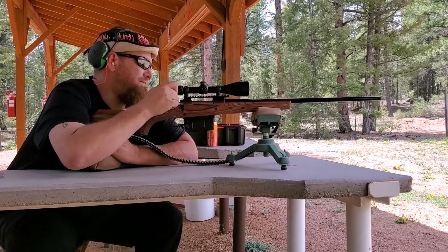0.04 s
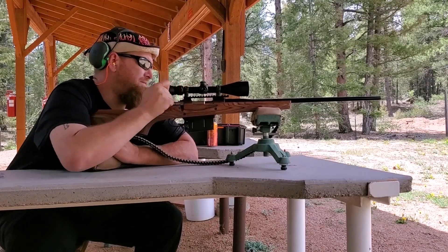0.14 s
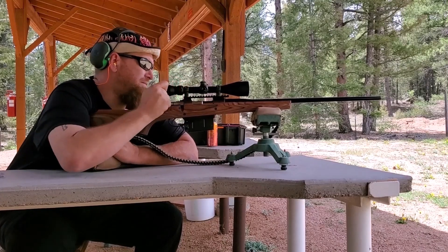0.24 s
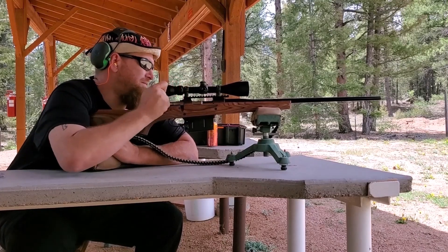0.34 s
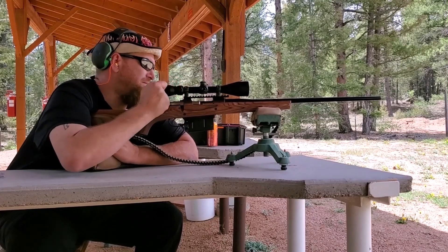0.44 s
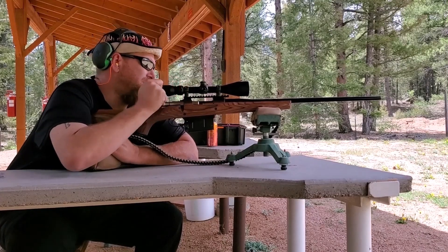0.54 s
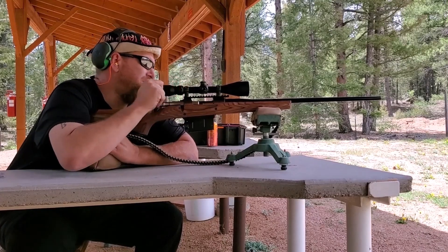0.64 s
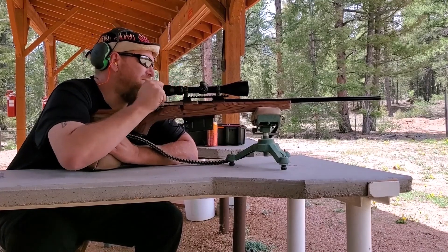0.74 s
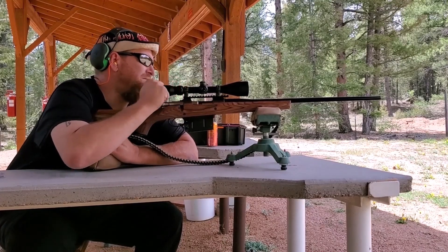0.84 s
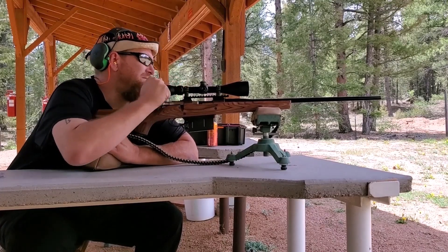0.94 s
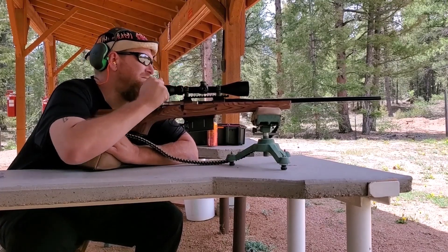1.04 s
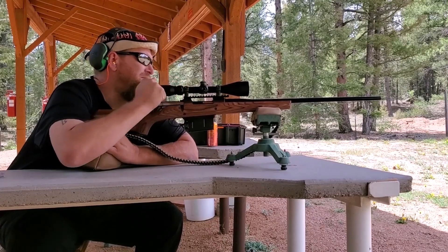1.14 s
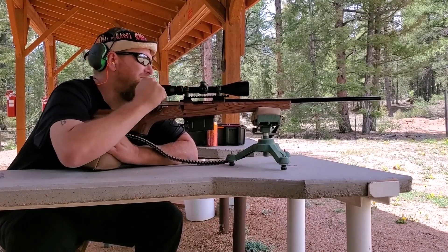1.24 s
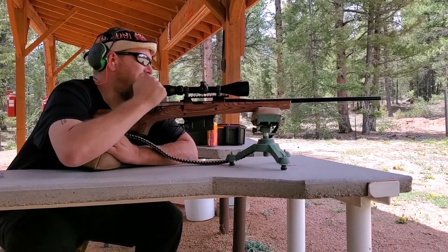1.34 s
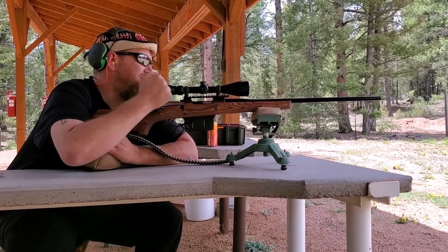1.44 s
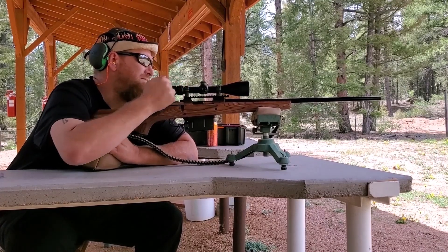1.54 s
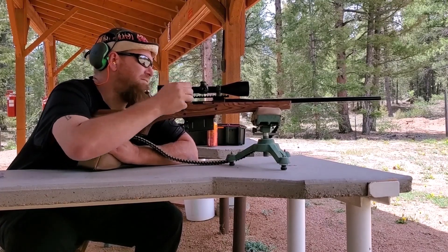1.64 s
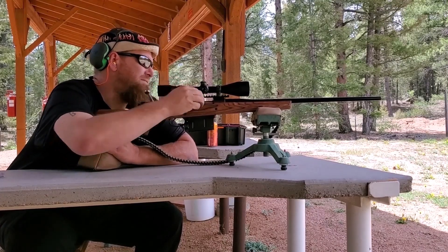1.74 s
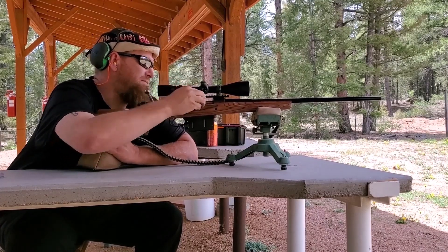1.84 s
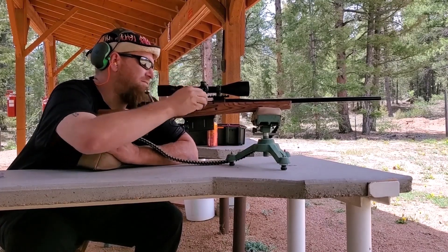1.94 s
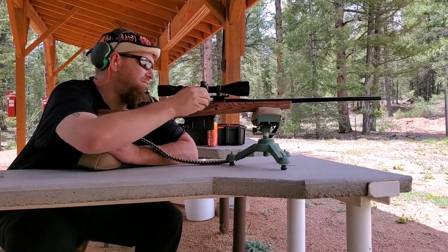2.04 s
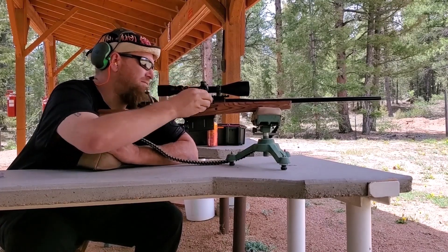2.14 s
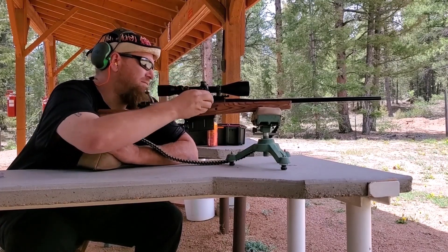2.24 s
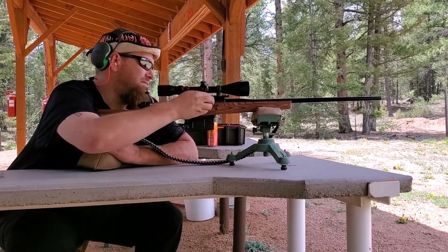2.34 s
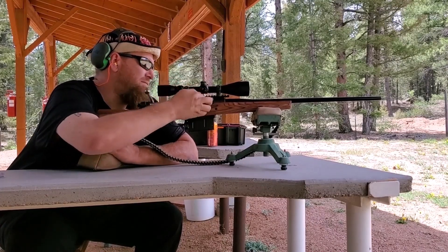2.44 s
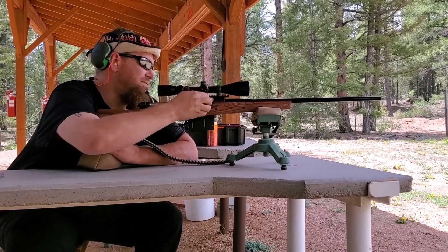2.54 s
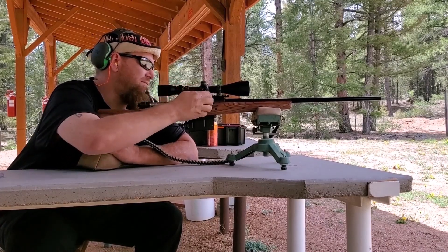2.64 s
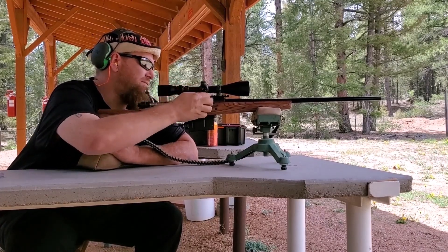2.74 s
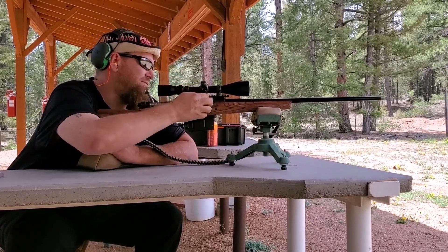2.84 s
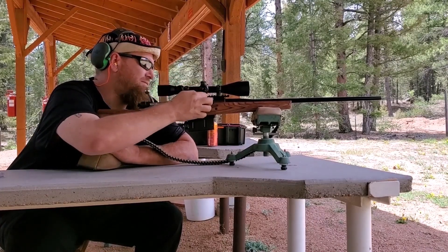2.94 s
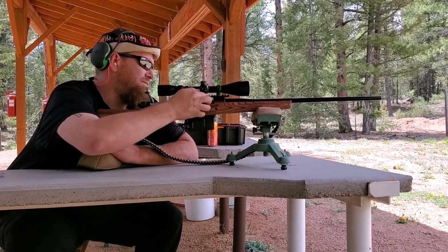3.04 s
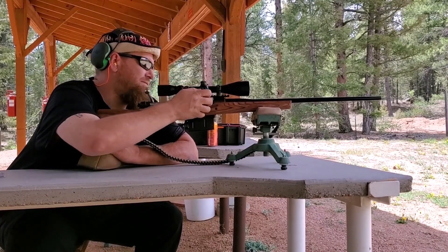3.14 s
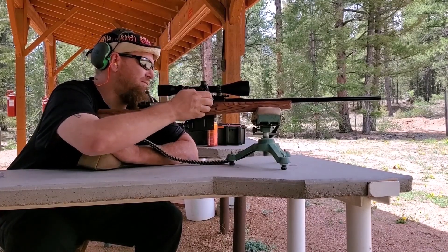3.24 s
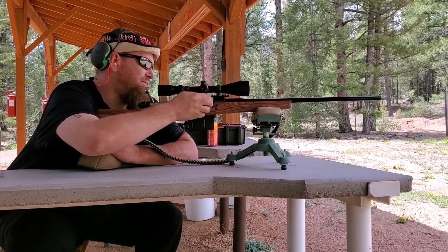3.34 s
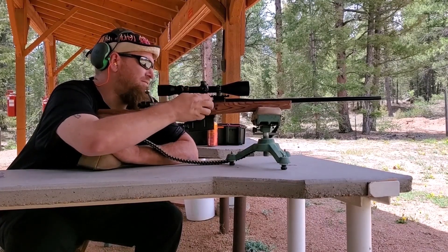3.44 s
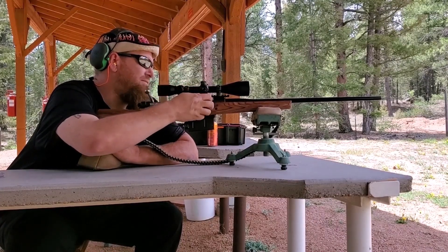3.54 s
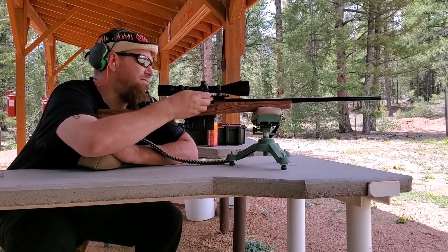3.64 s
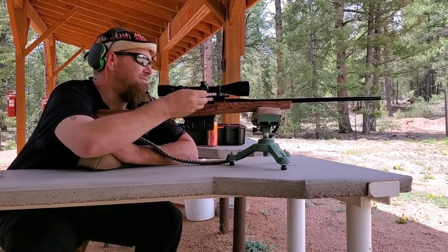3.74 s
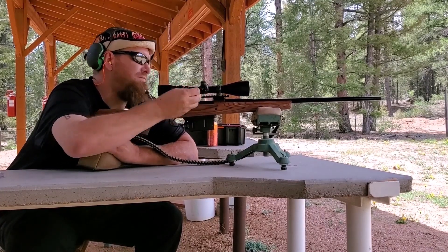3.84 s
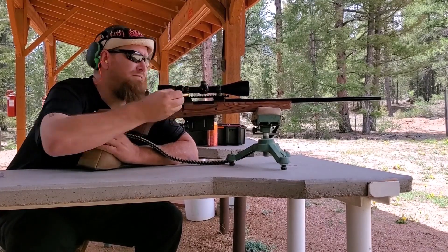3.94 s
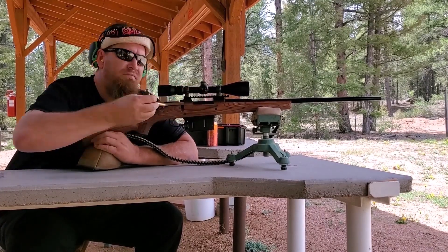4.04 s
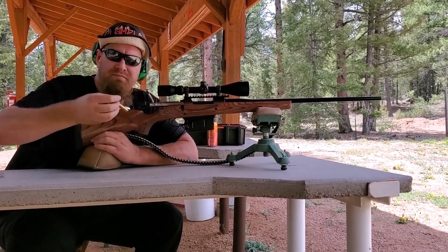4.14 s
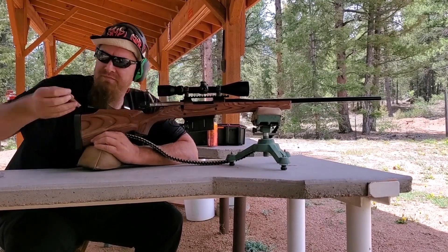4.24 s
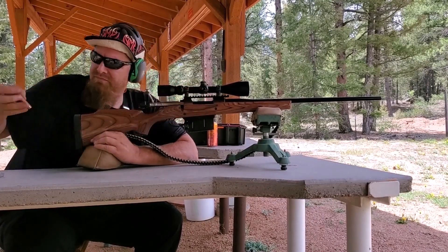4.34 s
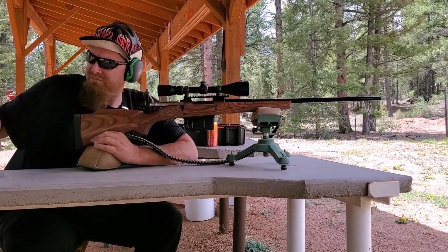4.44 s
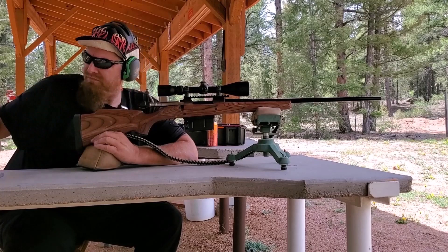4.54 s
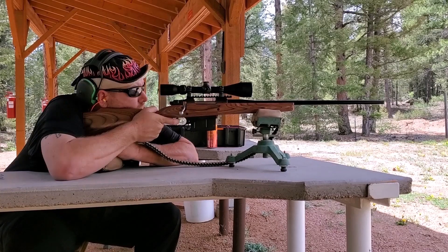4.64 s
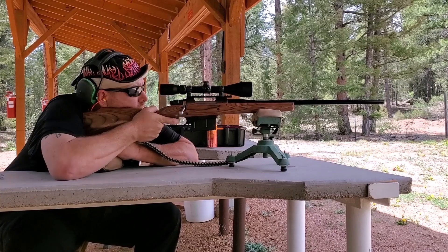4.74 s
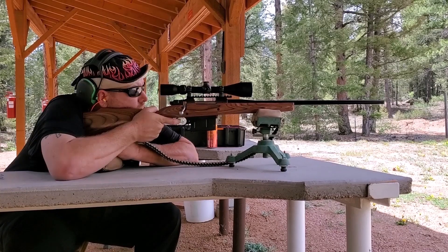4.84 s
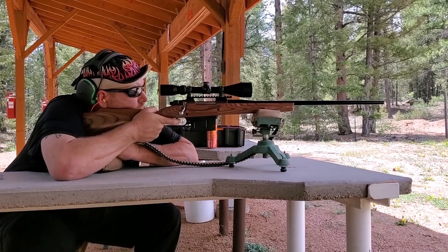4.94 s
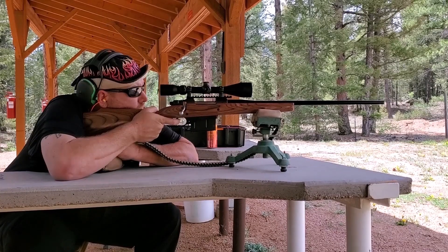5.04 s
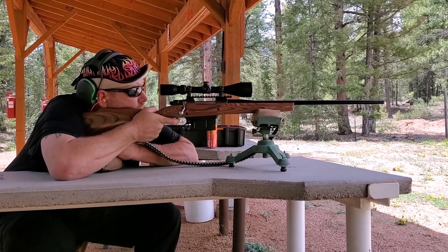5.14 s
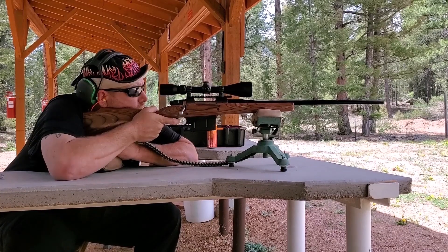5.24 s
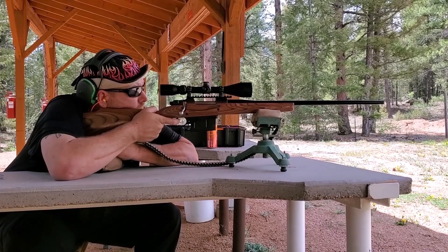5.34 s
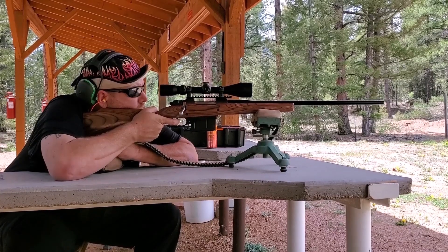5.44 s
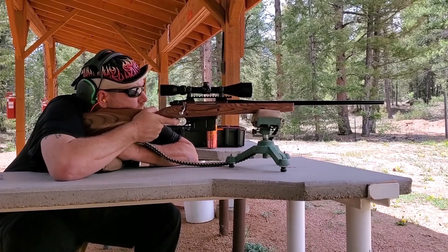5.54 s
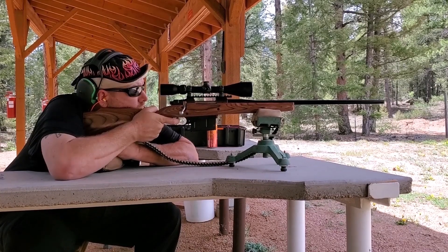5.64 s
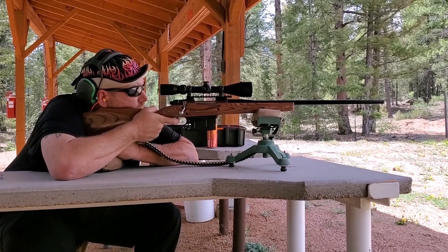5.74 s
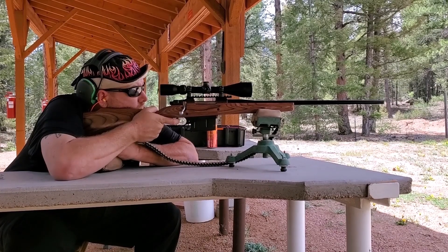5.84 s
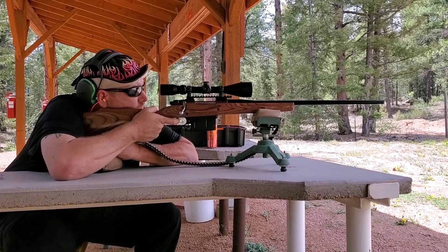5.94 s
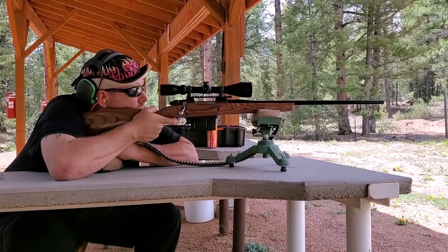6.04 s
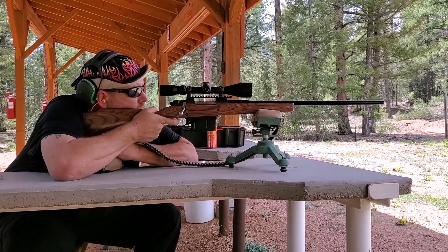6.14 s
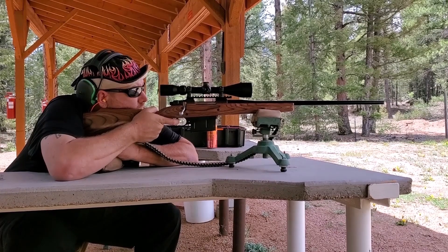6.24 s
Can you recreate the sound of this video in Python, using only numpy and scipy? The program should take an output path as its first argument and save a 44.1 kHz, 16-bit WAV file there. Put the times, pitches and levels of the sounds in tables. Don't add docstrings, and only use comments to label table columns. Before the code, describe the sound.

Hands work a rifle on a bench outdoors, very close: a light rattle, a pause, then a hard clattering bolt stroke with bright brass tinkles, later smaller clicks and scrapes and a final snap. Soft breeze and hiss lie behind. The sound dips momentarily, then a single sharp rifle blast fills the shelter; a far plate slaps and echoes dull away among trees, leaving the breeze subdued.

```python
import sys
import numpy as np
from scipy import signal
from scipy.fft import rfft, irfft, next_fast_len
from scipy.io import wavfile
from scipy.ndimage import uniform_filter1d, map_coordinates

SR = 44100
rng = np.random.default_rng(int(sys.argv[2]) if len(sys.argv) > 2 else 0)


def digitize_waveform(pressure):
    field = np.atleast_2d(pressure).T
    bounded = np.clip(field, -1, 1)
    quanta = np.round(bounded * 32767).astype(np.int16)
    wavfile.write(sys.argv[1], SR, quanta)


def invert_db(x):
    u = np.asarray(x, float) / 20
    return 10 ** u


N = 277157
SECONDS = np.arange(N) / SR
SHOT_S, SLAP_S = 4.85542, 5.14235


def unit(x):
    return x / np.sqrt(np.mean(x ** 2) + 1e-20)


def along(points, hz):
    f, v = np.transpose(points)
    return np.interp(np.log(hz + 1), np.log(f + 1), v)


def curve(points):
    s, v = np.transpose(points)
    return np.interp(SECONDS, s, v)


def wobble(rate):
    knots = rng.standard_normal(int(N * rate / SR) + 4)
    return map_coordinates(knots, [SECONDS * rate])


def filtered(x, response):
    m = next_fast_len(x.shape[-1] + 8192)
    return irfft(rfft(x, m) * response(np.fft.rfftfreq(m, 1 / SR)), m)[..., :x.shape[-1]]


def resonances(modes):
    def response(f):
        total = 0
        for k, (centre, width, db) in enumerate(modes):
            damping = 1j * f * width
            total = total + (-1) ** k * invert_db(db) * damping / (centre * centre - f * f + damping)
        return total
    return response


def no_lows(hz):
    return lambda f: f ** 2 / (f + hz / 1j) ** 2


def add(track, s, sound):
    start = round(s * SR)
    track[..., start:start + sound.shape[-1]] += sound


def rush(spectrum, patchy_db, tilt=lambda hz, s: 0, alike=None):
    # frequency in Hz, left-right likeness from -1 to 1.
    usual_likeness = [(60, 0.9), (290, 0.69), (640, 0.21), (1400, -0.34), (3000, -0.064)]
    likeness = usual_likeness if alike is None else alike
    hz, s, z = signal.stft(rng.standard_normal((2, N)), SR, nperseg=256)
    patches = uniform_filter1d(rng.standard_normal(z.shape[1:]), size=3, axis=0)
    patches = uniform_filter1d(patches, size=14, axis=1)
    gain = invert_db(patchy_db * unit(patches) + tilt(hz[:, None], s))
    pair = signal.istft(z * gain, SR, nperseg=256)[1][:, :N]
    power = np.mean(invert_db(along(spectrum, np.arange(SR // 2))) ** 2)

    def mid_side(f):
        angle = np.arccos(np.clip(along(likeness, f), -1, 1)) / 2
        return invert_db(along(spectrum, f)) / np.sqrt(power) * [np.cos(angle), np.sin(angle)]

    mid, side = filtered(pair, mid_side)
    return np.array([mid + side, mid - side])


def dying(parts, s):
    age = SECONDS - s
    power = sum(invert_db(db - 60 * np.abs(age) / t60) ** 2 for db, t60 in parts)
    return (age >= 0) * np.sqrt(power)


def slips(response):
    uneven_db = 4.3 * wobble(300) + 1.2 * wobble(70)
    return unit(filtered(rng.standard_normal(N) * invert_db(uneven_db), response))


def from_right(pulse, s, lag_s, left_db, low_hz):
    pair = np.zeros((2, N))
    add(pair[0], s + lag_s, invert_db(left_db) * pulse)
    add(pair[1], s, pulse)
    return filtered(pair, no_lows(low_hz))


def woods():
    # frequency in Hz, dB per Hz.
    pines = [(47, -32), (80, -12.5), (118, -10), (214, -8), (301, -10), (476, -7.5), (534, -9),
             (753, -11.5), (1170, -24), (1650, -26), (2150, -37), (4000, -44.5), (5200, -74), (8800, -120)]
    rumble = [(12, -53.5), (20, -20.5), (36, -12), (50, -0.5), (64, 3.5), (130, -14), (200, -17.5),
              (260, -43), (440, -120)]
    hiss = [(1470, -35.5), (2100, -11.5), (2450, -16.5), (2800, -7), (3320, -6), (3460, -8), (4310, -6.5),
            (5420, -7.5), (5910, -6.5), (6250, 0), (6550, -0.5), (7150, -12.5), (7920, -19.5),
            (10800, -9.5), (15100, -4), (16100, -10.5), (16500, -29.5)]
    # time in seconds, level in dB.
    breeze_level = [(0, -56), (0.9, -59.5), (1.3, -54.5), (1.67, -57.5), (2.3, -56.5), (3.37, -61.5),
                    (3.65, -60), (3.98, -61.5), (4.8, -63.5), (5.7, -69.5), (6.28, -70)]
    # time in seconds, gain in dB.
    duck = [
        (0, 5),
        (2.5, 3.5),
        (4, 3),
        (4.85, 2.5),
        (4.9, -6),
        (6.28, -2),
    ]
    # peak in seconds, peak in dB, dB lost per second on both sides, left over right in dB.
    gusts = [(0, -65.5, 23.5, -6), (1.18, -66, 84.5, -8), (1.36, -54.5, 76.5, 4), (1.7, -60.5, 80.5, -3.5),
             (2.45, -60.5, 57, 2), (3.4, -57, 99.5, -1.5), (3.85, -66.5, 69, -2), (4.19, -55, 60.5, -2.5),
             (4.57, -63, 89, -2), (4.82, -71, 149.5, -1.5), (5.1, -66.5, 60.5, 1), (5.68, -66.5, 153, 9),
             (5.81, -63.5, 202, 11), (6, -69, 201.5, 7), (6.12, -75, 200.5, 12), (6.24, -62, 110.5, 13)]
    # frequency in Hz, left over right in dB.
    lean = [(300, -2), (700, -1), (1600, 4.5), (5000, 3.5), (12000, 2)]
    calm_db, hiss_db = -78, -83
    duck_db = curve(duck)
    breeze = invert_db(curve(breeze_level) + 2.0 + wobble(5.4)) * rush(pines, patchy_db=1.53)
    push = invert_db(calm_db + duck_db)
    for s, db, fall_db, left_db in gusts:
        gust = invert_db(db - 3.5 - fall_db * np.abs(SECONDS - s))
        push = push + gust * invert_db([[left_db / 2], [-left_db / 2]])
    flutter_db = 1.6 * wobble(9.1) + 1.2 * np.array([wobble(6), wobble(5.1)])
    buffet = push * invert_db(flutter_db) * rush(rumble, patchy_db=-0.5)
    air = breeze + invert_db(hiss_db + 2.5 + duck_db) * rush(hiss, patchy_db=1.4)
    return buffet + filtered(air, lambda f: invert_db(along(lean, f) * [[.5], [-.5]]))


def shelter(x):
    # frequency in Hz, t60 in seconds.
    decay = [(500, 0.13), (3000, 0.11), (12000, 0.052)]
    delay_s = .002
    wet, hop = np.zeros((2, N + SR)), SR // 5
    for start in range(0, N, hop):
        hz, t, z = signal.stft(rng.standard_normal((2, SR // 4)), SR, nperseg=128)
        fall = invert_db(-60 * t / along(decay, hz)[:, None])
        tail = signal.istft(z * fall, SR, nperseg=128)[1]
        tail = tail / np.linalg.norm(tail[0])
        add(wet, start / SR + delay_s, signal.fftconvolve(x[None, start:start + hop], tail, axes=1))
    return wet[:, :N]


def strokes():
    # full force in seconds, rise in seconds, hold in seconds, scrape in dB, hum over scrape in dB.
    pushes = [(0.154, 0.062, 0.11, -44.5, 0), (0.43, .025, 0.025, -63, 2),
              (0.781, 0.043, 0.022, -74.5, 12.5), (1.024, 0.028, 0.027, -69.5, 15.5),
              (1.085, 0.15, 0.081, -73, -6), (1.202, 0.033, 0.055, -39, 1), (1.31, 0.05, 0.087, -41.5, -2),
              (1.782, 0.068, .005, -79, 17), (1.85, 0.077, 0.027, -82, 9), (1.941, 0.032, 0.099, -51, 0.5),
              (2.364, 0.08, .03, -73.5, 15), (2.399, 0.018, 0.023, -45.5, -1),
              (2.433, 0.011, 0.0027, -44, 2.5), (3.014, 0.028, 0.057, -43, -3),
              (3.133, .02, 0.037, -66.5, 7), (3.206, .02, 0.02, -65, -8), (3.249, 0.012, 0.074, -60.5, 3),
              (3.513, 0.38, .005, -79.5, 19.5), (3.641, 0.011, 0.0041, -36, -6.5),
              (3.695, 0.06, 0.032, -51, -7), (3.749, .02, 0.017, -60, 4), (3.26, .02, 0.0078, -69, -3),
              (2.448, .02, .02, -56, 5.5), (2.582, .04, .02, -72, 9), (3.79, 0.011, 0.0021, -41.5, 3.5)]
    rise_db, let_go_db_per_s = 29.5, 331
    receiver_db, receiver_grows = -50.5, 0.74
    gains, t = np.zeros((3, N + SR)), np.arange(-SR // 8, SR // 2) / SR
    for s, rise_s, hold_s, db, hum_db in pushes:
        before, after = np.clip(-t, 0, None), np.clip(t - hold_s, 0, None)
        force = invert_db(-rise_db * before / rise_s - let_go_db_per_s * after)
        tube_db = receiver_db + receiver_grows * (db + 45.0)
        add(gains, s + t[0], force * invert_db([[db], [tube_db], [db + hum_db]]))
    return gains[:, :N]


def stock(hum):
    # time in seconds, peak in dB, pitch in Hz.
    knock_times = [(0.142, -39, 760), (0.171, -39, 712), (0.201, -22.5, 793), (0.241, -38.5, 722),
                   (0.903, -51.5, 650), (1.027, -44.5, 720), (1.194, -38, 720), (1.205, -23.5, 796),
                   (1.214, -25.5, 777), (1.255, -27, 695), (1.276, -46, 794), (1.293, -21.5, 755),
                   (1.299, -30, 738), (2.417, -44, 760), (3.098, -45, 760), (3.267, -52, 760),
                   (3.281, -55, 780), (1.342, -27, 750), (1.382, -28.5, 786), (1.434, -40.5, 796),
                   (1.952, -42.5, 764), (1.984, -39.5, 774), (1.999, -41, 890), (2.407, -37.5, 754),
                   (2.436, -28, 775), (2.457, -30.5, 752), (2.53, -43, 773), (2.682, -47.5, 680),
                   (2.781, -47, 791), (3.072, -29.5, 770), (3.129, -41, 756), (3.642, -29, 749),
                   (3.744, -45, 746), (3.752, -41.5, 757), (3.76, -44, 744), (3.025, -48, 750),
                   (3.037, -54, 760), (1.2635, -41, 726), (0.153, -43.5, 780), (3.795, -32, 758),
                   (3.803, -41, 750)]
    # time in seconds, peak in dB, pitch in Hz.
    raps = [(0.14, -46, 1620), (0.151, -45.5, 1650), (0.425, -55, 1600), (0.439, -53, 1630),
            (0.463, -57, 1590), (1.03, -56, 1570), (1.061, -53.5, 1604), (1.776, -61, 1570),
            (2.785, -58, 1374), (2.8, -59, 1403), (3.005, -52.5, 1570), (3.029, -43.5, 1560),
            (3.221, -55, 1520), (3.25, -65, 1340), (3.519, -61, 1586), (3.627, -53, 1620),
            (3.799, -43, 1374)]
    # time in seconds, level in dB, pitch in Hz.
    thumps = [
        (0.301, -46.5, 179),
        (1.381, -37.5, 167.6),
    ]
    # frequency in Hz, width in Hz, level in dB.
    hollow = [(625, 12, 0.5), (756, 24, 1), (816, 250, -5)]
    knocks, t = np.zeros(N), np.arange(SR // 8) / SR
    for s, db, hz in [*knock_times, *raps]:
        t60 = np.interp(db, [-37.5, -22.5], [0.036, 0.02])
        swell = invert_db(db + 7.5 - 60 * t / t60) * (1 - np.exp(-t / 0.0023))
        wander_hz = np.interp(db, [-48, -40], [450, 0])
        wander = wander_hz / SR * np.cumsum(uniform_filter1d(rng.standard_normal(len(t)), size=40))
        add(knocks, s, swell * np.sin(2 * np.pi * (hz * t + wander + rng.uniform())))
    for s, db, hz in thumps:
        thud = invert_db(db - 60 * t / .15) * (1 - np.exp(-t / .008))
        add(knocks, s, thud * np.sin(2 * np.pi * hz * t))
    steep = lambda f: resonances(hollow)(f) * resonances([(770, 450, 0)])(f)
    return knocks + invert_db(-3.0) * hum * slips(steep)


def brass():
    # time in seconds, peak of the main ring in dB, side rings in dB, top ring in dB over the main.
    cases = [(0.1979, -48, -3, -11), (0.2123, -46, -2, -10), (0.2384, -35, -6.5, -4), (0.2572, -48, -1, 2),
             (0.2794, -50, 0.5, -3), (1.217, -37.5, -5, -3.5), (1.3056, -34, -18.5, -8.5),
             (1.345, -38.5, -10, 0), (1.3808, -38.5, -8, -20.5), (1.926, -53, -40, -3),
             (1.943, -39, -30.5, -9), (1.9839, -44.5, -20, 2), (2.031, -58.5, 6, 9),
             (2.4014, -61, 7.5, 4.5), (2.4324, -34.5, -9, -19.5), (3.024, -51, 0, 0),
             (3.0557, -39.5, -13, -17), (3.084, -66, 4, -14), (3.245, -62.5, 6, -10), (3.27, -61.5, -1, -8),
             (3.7823, -46, -10, -18), (1.327, -39, -9, 2), (1.4314, -60, -14, -10), (2.006, -54, -1, 3),
             (2.412, -66, 3, 11)]
    ring_hz = [9476, 8700, 11530, 15240]
    lower_db, t60_s, split_hz = -4.5, 0.14, 24
    port_lag = 1.7 * np.array([[[0], [1]], [[1], [0]]])
    rings, t = np.zeros((2, N)), np.arange(SR // 4) / SR
    grip = np.exp(-(t / 0.078) ** 4)
    for s, db, side_db, top_db in cases:
        for hz, rel_db in zip(ring_hz, [0, side_db + lower_db, side_db, top_db]):
            pair_hz = hz + rng.normal(0, split_hz, (2, 1, 1))
            phase = rng.uniform(0, 2 * np.pi, (2, 1, 1)) + port_lag
            beat = np.sin(2 * np.pi * pair_hz * t + phase) * [[[1.2]], [[.45]]]
            fall = invert_db(db + rel_db + 1.5 - 60 * t / t60_s) * (1 - np.exp(-t / 0.00069))
            add(rings, s, fall * grip * beat.sum(axis=0))
    chatter = uniform_filter1d(np.abs(rings), size=200) * rng.standard_normal((2, N))
    rings = rings + invert_db(-11.0) * filtered(chatter, resonances([(12500, 5000, 0.0019)]))
    return rings * invert_db([[-1.5], [1.5]]) * invert_db(2.6 * np.array([wobble(120), wobble(120)]))


def steel(scrape, receiver):
    # time in seconds, peak in dB, brightness in dB, ping in Hz, ping over rattle in dB.
    snaps = [(0.148, -47, -17, 3050, 2), (0.165, -39, -14, 3330, -1), (0.172, -33, -9.5, 3700, -1),
             (0.1802, -56, -8, 3490, -8), (0.197, -29.5, -15, 3060, -7), (0.237, -24, -18, 2970, -7),
             (1.193, -33, -22, 3040, -5), (1.2146, -15, -21.5, 3100, -28), (1.2341, -14.5, -20, 4380, -16),
             (1.2518, -22, -16.5, 2650, -13), (1.307, -23.5, -16, 3060, -8),
             (1.3172, -13.5, -23, 3600, -14.5), (1.346, -22, -21, 3080, -11), (1.38, -18, -19, 3840, -8.5),
             (1.389, -28, -13, 4300, -5), (1.4316, -30, -19, 3990, -5), (1.9456, -31.5, -35, 3120, -7.5),
             (1.9834, -33.5, -21, 4150, -6), (1.999, -31.5, -22, 3950, -6), (2.3992, -34, -21, 3980, 8),
             (2.4333, -13, -22.5, 3200, -20), (2.991, -50, -31, 3100, -3), (3, -41, -29.5, 3200, -6),
             (3.009, -42, -28, 3100, -10), (3.0244, -33.5, -22, 3150, -8), (3.0568, -22, -24, 3340, -7.5),
             (3.071, -29, -18, 4960, -6), (3.1304, -33.5, -19.5, 2810, -6.5),
             (3.2437, -40.5, -27, 3270, -8), (3.2747, -37, -32, 3800, -1.5),
             (3.6265, -38.5, -23, 3950, -5.5), (3.6409, -19.5, -21, 2880, -8.5),
             (3.754, -41.5, -33, 2900, 5.5), (3.781, -26, -31, 3460, -9), (3.7925, -16, -21, 3950, -9),
             (3.7992, -31, -18.5, 4290, -12)]
    # time in seconds, peak in dB, ping in
    # Hz.
    ticks = [(0.1274, -61, 3170), (0.4228, -54, 3300), (0.4438, -51, 2940), (1.024, -64, 3010),
             (1.147, -63, 3570), (1.785, -67, 3150), (1.805, -60, 3130), (1.8497, -67, 3300),
             (2.232, -63.5, 4100), (2.3253, -64, 3850), (2.345, -67, 3950), (2.3622, -60, 4070),
             (2.3778, -52, 3880), (2.388, -61, 3970), (2.7874, -72, 3500), (3.2674, -43, 3460),
             (3.291, -52, 3300), (3.311, -56, 3900), (3.51, -65, 4250), (3.7886, -39.5, 4130),
             (0.5857, -56, 7600), (0.785, -61, 3100), (1.0588, -47, 3250), (1.1414, -54, 3400),
             (1.77, -67, 3210), (1.926, -53, 3120), (2.6415, -56, 3150), (3.2067, -52, 3970)]
    # frequency in Hz, width in Hz, level in dB.
    parts = [(2110, 850, -12), (3040, 530, -0.5), (3600, 740, 1), (4300, 730, -0.5), (5560, 500, -3.5),
             (5920, 600, -3), (7410, 740, -8)]
    tube_modes = [(1090, 130, -6), (1340, 87, 4), (1620, 370, -2)]
    slide = [(3080, 500, 2.5), (3700, 700, 0), (4400, 920, -2), (5900, 1100, -7.5), (7400, 1300, -11)]
    tick_bright_db, tick_ping_db, lag_s = -23.5, -4, 0.00042
    body, edge, pings = np.zeros((3, N))
    t = np.arange(SR // 8) / SR
    rise = 1 - np.exp(-t / 0.00025)
    snap_fall = invert_db(-60 * t / 0.012)
    rattle_fall = 1.12 * snap_fall + 0.26 * invert_db(-60 * t / 0.035)
    faint_snaps = [(s, db, tick_bright_db, hz, tick_ping_db) for s, db, hz in ticks]
    for s, db, bright_db, ping_hz, ping_db in [*snaps, *faint_snaps]:
        rattle = rise * rng.standard_normal((2, len(t))) * rattle_fall
        add(body, s, invert_db(db + 2.5) * rattle[0])
        add(edge, s, invert_db(db + bright_db + 10.0) * rattle[1])
        add(pings, s, rise * invert_db(db + ping_db + 2.5) * snap_fall * np.sin(2 * np.pi * ping_hz * t))
    thin = lambda f: resonances([(11000, 5000, 0)])(f) * no_lows(6000)(f)
    clicks = filtered(body, resonances(parts)) + filtered(edge, thin)
    sliding = invert_db(-6.5) * scrape * (slips(resonances(slide)) + invert_db(-12.5) * slips(thin))
    tube = invert_db(-11.5) * filtered(body, resonances(tube_modes))
    tube = tube + invert_db(-1.5) * receiver * slips(resonances(tube_modes))
    tube_pair = np.array([tube, np.roll(tube, round(lag_s * SR))])
    bench_cancels = lambda f: 1 - 0.42 * resonances([(2150, 600, 0)])(f)
    return filtered(clicks + pings + sliding + tube_pair, bench_cancels)


def target():
    # frequency in Hz, level in dB, t60 in seconds.
    plate = [(2120, -13.5, 0.012), (2660, -10.5, 0.0096), (3420, -14.5, 0.0088), (4290, -16, 0.0081),
             (5840, -17.5, 0.0056), (7040, -22, 0.007), (9800, -31, 0.004), (12100, -30, 0.0036),
             (14750, -30, 0.0035)]
    # frequency in Hz, dB per Hz.
    slap_colour = [(1500, -22), (4000, 6), (7000, -4.5), (10000, -15.5), (15500, -13.5)]
    # level in dB, t60 in seconds.
    scatter_decay = [
        (-44, 0.12),
        (-49, 0.54),
    ]
    t = np.arange(SR // 50) / SR
    ring = sum(invert_db(db - 60 * t / t60) * np.sin(2 * np.pi * hz * t) for hz, db, t60 in plate)
    slap = (1 - np.exp(-t / 0.00028)) * ring
    scatter = dying(scatter_decay, SLAP_S + 0.00096) * rush(slap_colour, patchy_db=4.5)
    return from_right(slap, SLAP_S, .0005, -6.5, low_hz=900) + scatter


def echoes():
    # level at the fullest in dB, t60 in seconds.
    answers = [
        (-20.5, 0.23),
        (-28.5, 0.7),
        (-34, 1.424),
        (-58.5, 4.5),
    ]
    # frequency in Hz, dB per Hz.
    colour = [(29, -59.5), (50, -24.5), (260, -8.5), (420, -6.5), (620, -5), (800, -1.5), (1020, -4.5),
              (1200, -8), (1450, -7.5), (1850, -6.5), (2200, -9.5), (3000, -10.5), (6400, -18.5),
              (9500, -25), (12000, -23), (16000, -28.5)]
    # frequency in Hz, extra dB lost per second.
    loss = [(60, 11.5), (250, 21), (700, -4), (1350, -10), (2000, -13), (3500, -8), (4500, -3.5), (5300, 9),
            (7000, 18), (10000, 36.5), (13000, 42), (16000, 67)]
    # frequency in Hz, left-right likeness.
    echo_likeness = [(60, 0.5), (290, 0.62), (700, 0.18), (1400, -0.22), (2400, 0.12), (4000, 0.11)]
    # time in seconds, dB over the field.
    strong_returns = [(4.8646, 4.2), (4.8725, 5), (4.879, 2.4), (4.8853, 2.8), (4.895, 1.9), (4.9106, 1.4),
                      (4.92, 1.5), (4.881, 1.2), (4.955, 2.6), (4.978, 2.5), (5.034, 1.7), (5.121, 2.8)]
    # frequency in Hz, width in Hz, level in dB.
    roof = [(760, 180, -3.5), (1020, 130, -3.5), (1870, 200, -4.5)]
    fill_s, fill_db, return_s, boom_s = 0.032, 4.5, .0015, 0.088

    def ageing(hz, s):
        old = np.clip(s - SHOT_S, 0, None)
        return -along(loss, hz) * old - 38 * (hz / 4000) ** 1.19 * old ** 2

    age = np.clip(SECONDS - SHOT_S, 0, None)
    field = rush(colour, patchy_db=.6, tilt=ageing, alike=echo_likeness)
    filling = (SECONDS > SHOT_S) * invert_db(answers[0][0] - fill_db * (1 - age / fill_s))
    full = dying(answers, SHOT_S + fill_s)
    returns_db = sum(db * np.exp(-((SECONDS - s) / return_s) ** 2) for s, db in strong_returns)
    uneven = invert_db(5.0 + 0.48 * wobble(22) + 0.7 * wobble(150) + returns_db)
    field = np.where(full > 0, full, filling) * uneven * field
    boom = np.exp(-(age / boom_s) ** 2) * field
    field = field + filtered(boom, lambda f: sum(resonances([mode])(f) for mode in roof))
    return field * invert_db([[-.3], [.3]])


def blast():
    t = np.arange(SR // 50) / SR
    u = t / 0.000079
    front = 0.39 * (1 - u) * np.exp(-u)
    gas = .2 * rng.standard_normal(len(t)) * invert_db(-60 * t / 0.0067)
    swing_fall = np.exp(-(t / .0016) ** 4) + .27 * invert_db(-60 * t / .05)
    swing = .68 * np.cos(2 * np.pi * 830 * t - .5) * (1 - np.exp(-t / .0002)) * swing_fall
    return from_right(front + gas + swing, SHOT_S, 0.00034, -6.5, low_hz=131.3)


def scene():
    scrape, receiver, hum = strokes()
    metal, wood = steel(scrape, receiver), stock(hum)
    rifle = metal * invert_db([[-.4], [.4]]) + wood * invert_db([[.6], [-.6]])
    under_roof = shelter(invert_db(-1.0) * metal[0] + invert_db(-5.5) * wood)
    return woods() + rifle + under_roof + brass() + target() + echoes() + blast()


def roll_off(x):
    return signal.sosfilt(signal.butter(12, 16990, fs=SR, output="sos"), x)


def record(dry):
    # frequency in Hz, response in dB.
    microphone = [(15600, -1), (16100, -21), (17000, -52.5)]
    change_s, fade_s, fade_curve, deepest_db = 4.665, 0.036, 1.7, -23
    heard = filtered(dry, lambda hz: invert_db(along(microphone, hz)))
    distance = np.abs(SECONDS - change_s) / fade_s
    fade = np.clip(distance ** fade_curve, invert_db(deepest_db), 1)
    return roll_off(heard * fade)


dry = scene()
out = record(dry)
digitize_waveform(out)
```